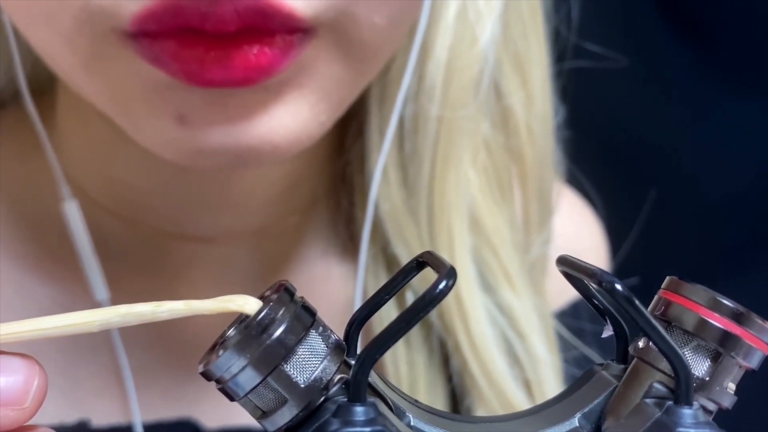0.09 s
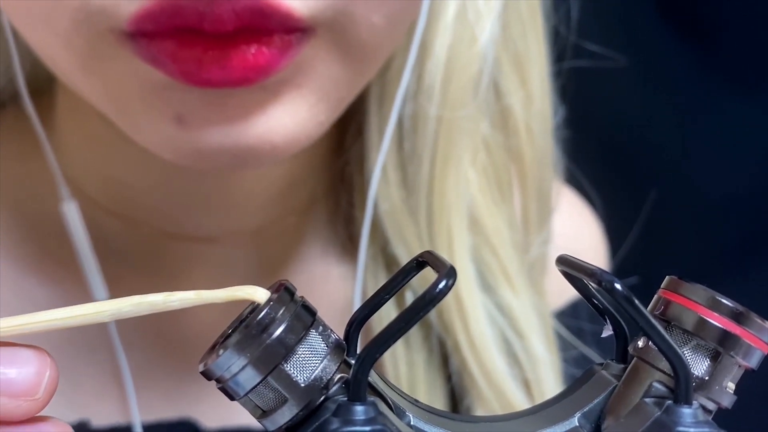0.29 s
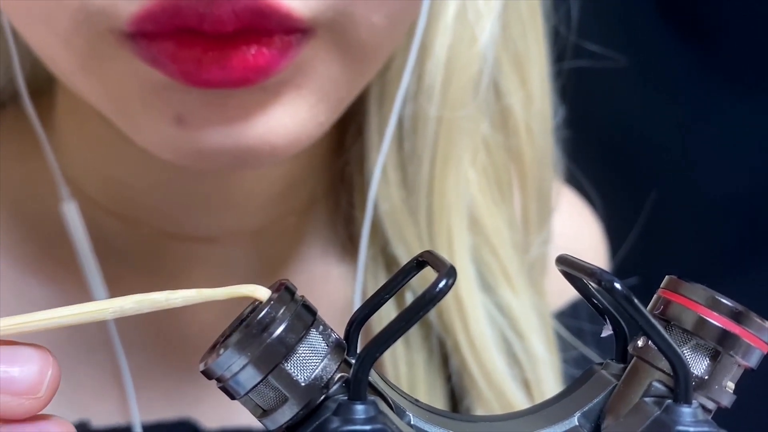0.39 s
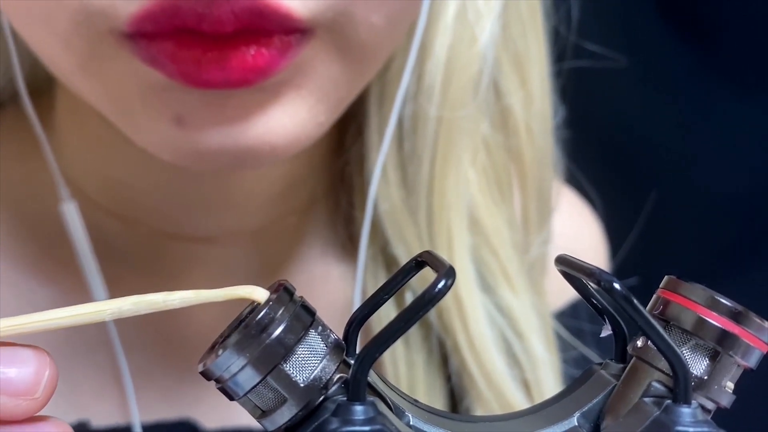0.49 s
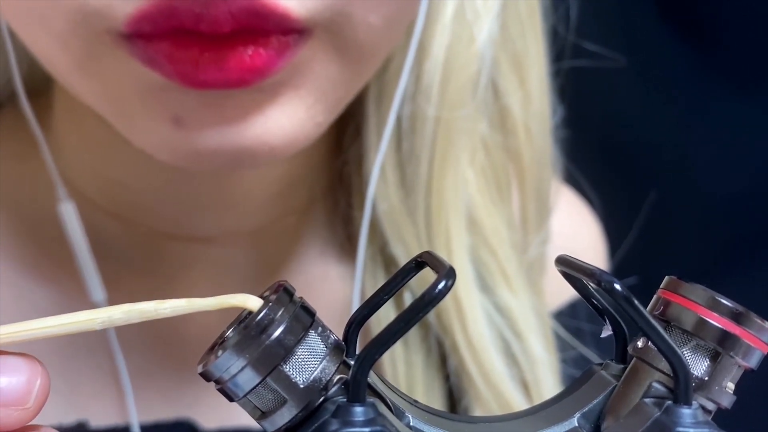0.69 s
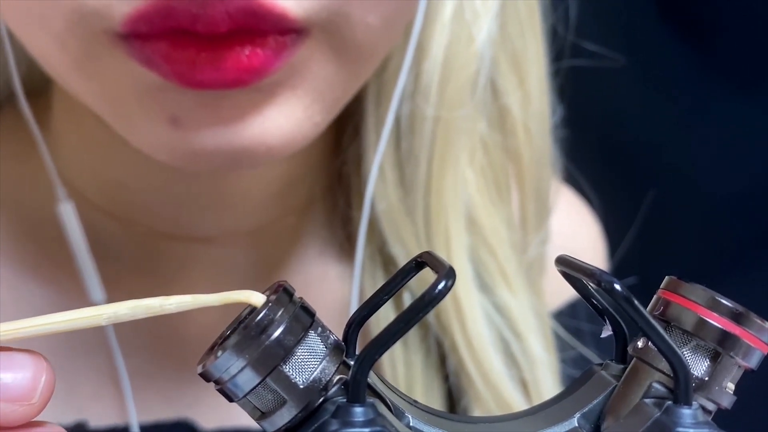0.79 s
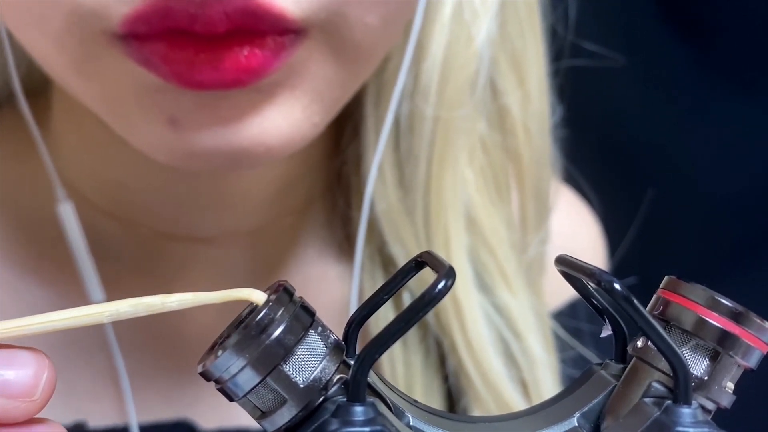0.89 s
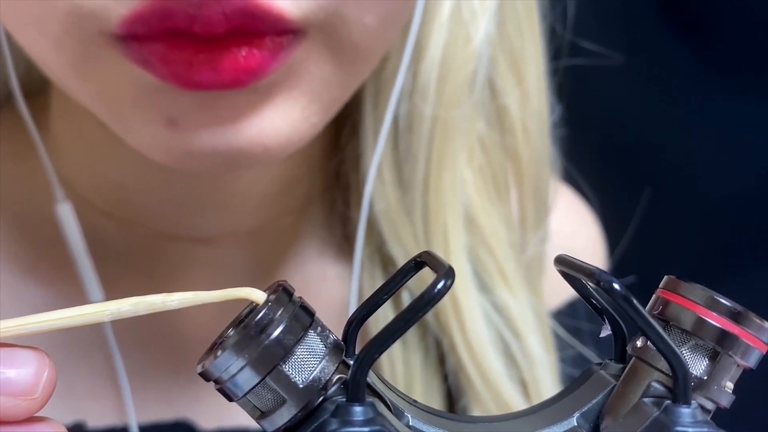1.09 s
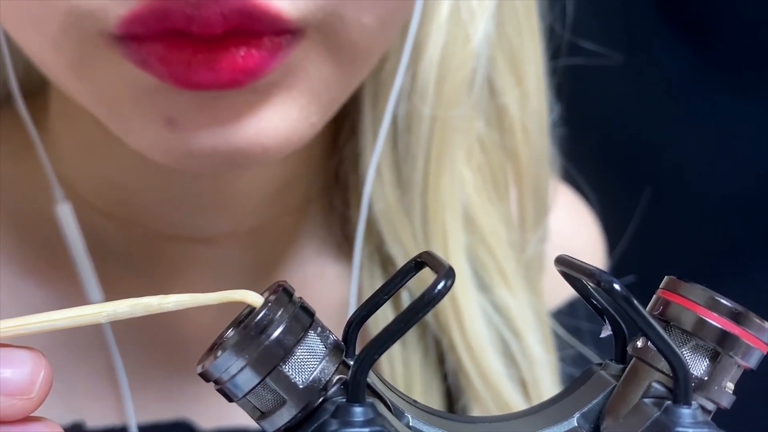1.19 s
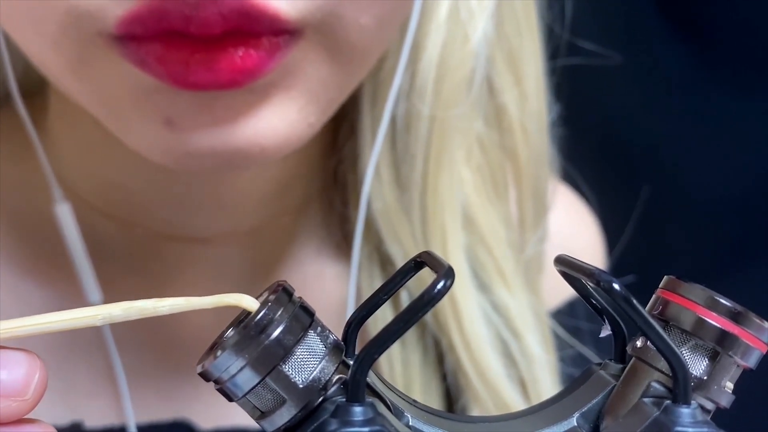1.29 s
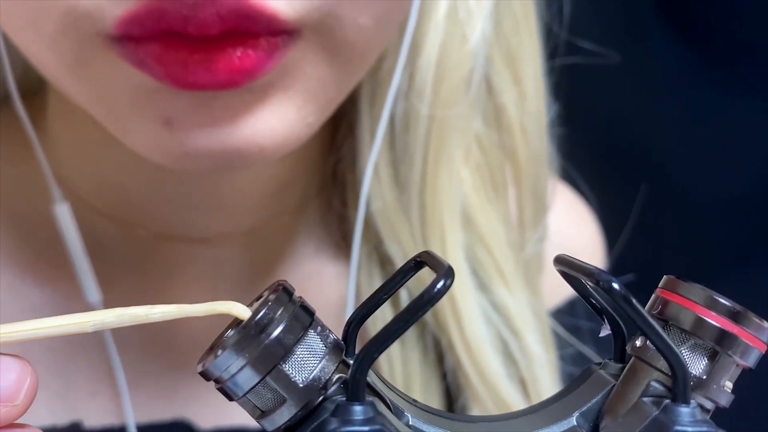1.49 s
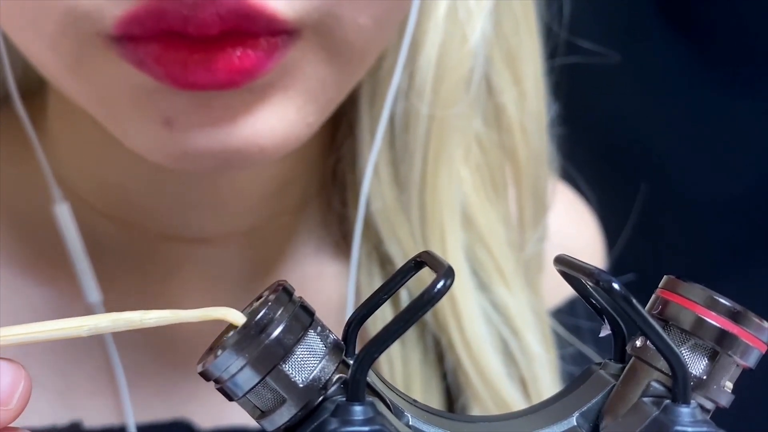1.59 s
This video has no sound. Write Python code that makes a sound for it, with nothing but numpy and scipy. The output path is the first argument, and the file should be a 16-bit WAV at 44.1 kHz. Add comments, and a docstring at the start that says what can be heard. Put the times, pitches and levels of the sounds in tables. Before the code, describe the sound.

Close scratching of a thin wooden stick on metal mesh, with sharp ticks and low handling bumps

```python
"""Pick on a microphone grille.

A wooden pick rubs, scrapes and pokes the mesh grille of the right capsule of a stereo microphone.
Contact is pulses, impulses and random slips, shaped by source spectra and resonances.
The right capsule hears it directly; the left hears mostly the ringing metal frame, plus a treble leak.
The soft mount rocks as decaying sines and slow noise, opposite in the two capsules, over faint hiss."""
import sys
import numpy as np
from scipy.fft import rfft, irfft, next_fast_len
from scipy.io import wavfile
from scipy.ndimage import map_coordinates

SR = 44100
rng = np.random.default_rng(int(sys.argv[2]) if len(sys.argv) > 2 else 0)


def output_pcm(signal):
    """Save a mono or channel-first signal as 16-bit PCM at the path in sys.argv[1].

    Samples are clipped to [-1, 1] before scaling.
    """
    pcm = np.clip(np.atleast_2d(signal).T, -1, 1) * 32767
    wavfile.write(sys.argv[1], SR, np.round(pcm).astype(np.int16))


N = 70560
T = np.arange(N) / SR  # time, s
M = next_fast_len(N + SR // 2)  # padded transform length, samples
HZ = np.fft.rfftfreq(M, 1 / SR)

REBOUND = 0.89  # swing back after a poke, as a share of the push
POKE_RING_DB = -18
# pokes, the tip slipping into the mesh: start_s (middle of the pulse), level_db, half_width_ms
POKE_EVENTS = [(.181, -39, 0.52), (0.288, -40, 0.35), (0.3227, -45.5, 0.34), (0.4262, -15.5, 0.35),
               (0.5613, -24.5, 0.54), (0.5702, -24.5, 0.24), (0.5765, -21, 0.24), (0.5784, -20.5, .7),
               (0.8061, -32, 1), (.8186, -23.5, 0.37), (0.8977, -22, 0.7), (.9010, -33, 0.45),
               (0.9054, -26, 0.4), (0.9195, -21.5, 0.43), (0.9478, -20.5, 0.33), (.9515, -23, 0.32),
               (0.955, -25.5, 1), (1.1566, -24.5, 0.51)]


def pokes():
    """Impulsive excitation: each push in and opposite swing back is a dull knock that rings the basket."""
    push = np.zeros(N)
    for start_s, level_db, half_width_ms in POKE_EVENTS:
        u = (T - start_s) * 1000 / half_width_ms
        swing = u * np.exp(1 - np.abs(u))  # peaks of -1 and +1 at u = -1 and +1
        push += amp(level_db) * swing * np.where(u > 0, REBOUND, 1)
    return filtered(push, 1 + amp(POKE_RING_DB) * ringing(BASKET_MODES))


GRAINS_PER_S, SMOOTH_SHARE = 2200, 0.83
WIRES_PER_S, WIRE_DB = 380, -9.5  # wire catches, level relative to the slips
ATTACK_S = 0.0025
# scrapes across the mesh: start_s, length_s, first_db, last_db, treble_db (relative), release_s (60 dB)
SCRAPE_EVENTS = [(.426, 0.034, -36.5, -33, -35, 0.029), (.53, 0.051, -44.5, -27.5, -30.5, 0.017),
                 (0.59, 0.012, -37, -32.5, -27, 0.058), (0.799, 0.021, -38, -32.5, -27, 0.032),
                 (0.895, .026, -27, -31, -31, 0.074), (0.946, 0.018, -29, -29, -27, 0.05)]
# spectrum of wood dragged over the grille: frequency_hz, level_db (relative)
GRILLE_SPECTRUM = [(30, -36.5), (90, 14.5), (250, 4), (500, 5.5), (700, 4.5), (900, -4.5), (1600, -14.5),
                   (2500, -15), (3300, -24.5), (6000, -31), (15000, -48)]


def scrapes():
    """Dry friction: slips and wire catches follow the contact pressure, which decays once the tip lets go."""
    body, treble = np.zeros(N), np.zeros(N)
    slips = friction(GRAINS_PER_S, SMOOTH_SHARE)
    for start_s, length_s, first_db, last_db, treble_db, release_s in SCRAPE_EVENTS:
        end_s = start_s + length_s
        level_db = np.interp(T, [start_s, end_s], [first_db, last_db])
        level_db -= 60 * np.maximum(T - end_s, 0) / release_s
        pressure = amp(level_db) * np.clip((T - start_s) / ATTACK_S, 0, 1)
        body += pressure * unit(slips + amp(WIRE_DB) * crossings(WIRES_PER_S))
        treble += amp(treble_db) * pressure * slips
    return filtered(body, basket(GRILLE_SPECTRUM)) + mesh(treble)


CLICK_T60_S, CRACK_DB = 0.0085, 2.5  # crack energy relative to the impulse
# clicks of single wires: start_s, level_db, treble_db (relative)
CLICK_EVENTS = [(.4274, -28.5, -19), (.457, -40.5, -9.5), (0.576, -34.5, -32), (.8182, -33, -11),
                (.9130, -31.5, -9), (0.9156, -22.5, -7.5), (0.9177, -24, -12), (.9642, -38, -1.5)]
# spectrum of a wire snapping free: frequency_hz, level_db (relative)
SNAP_SPECTRUM = [(100, -68.5), (400, 3), (720, -1.5), (1100, -7), (1600, -9), (2400, -6.5), (3300, -21.5),
                 (6000, -29), (15000, -33.5)]


def clicks():
    """Sudden release: a wire snapping free of the tip gives an impulse and a very short noise crack."""
    body, treble = np.zeros(N), np.zeros(N)
    for start_s, level_db, treble_db in CLICK_EVENTS:
        burst = amp(level_db) * fade(start_s, CLICK_T60_S)
        body += amp(CRACK_DB) * burst * rng.standard_normal(N)
        body[round(start_s * SR)] -= np.linalg.norm(burst)
        treble += amp(treble_db) * burst
    return filtered(body, basket(SNAP_SPECTRUM)) + mesh(treble * rng.standard_normal(N))


# light rubbing on the rim before, between and under the scrapes: time_s, level_db
RUB_LEVELS = [(0, -57), (.025, -58), (.058, -95), (.12, -95), (.145, -53), (.195, -49), (.21, -60),
              (.235, -50), (.275, -48), (.30, -66.5), (.325, -68), (.35, -80), (.52, -70), (.54, -53.5),
              (.61, -52), (.68, -77), (.71, -87), (.73, -65.5), (.795, -57.5), (.83, -53.5), (.86, -89),
              (.89, -84), (.91, -57), (.975, -53), (1.01, -70), (1.14, -66.5)]
# spectrum of wood on the rim: frequency_hz, level_db (relative)
RUB_SPECTRUM = [(40, -6), (150, 2), (300, 7.5), (550, -3.5), (700, 2), (900, -1.5), (1150, -1),
                (1500, -10.5), (2700, -8), (3300, -17), (4300, -23), (15000, -32.5)]


def rim_rubbing():
    """Light sliding friction: the pick rubs the rim under a varying pressure."""
    return rubbing(RUB_LEVELS, RUB_SPECTRUM, [])


# the long slide that ends the gesture: time_s, level_db
SLIDE_LEVELS = [(1.14, -69), (1.16, -50), (1.185, -49), (1.235, -62), (1.275, -53.5), (1.315, -58.5),
                (1.345, -54.5), (1.41, -62.5), (1.47, -60.5), (1.55, -63.5), (1.6, -50.5)]
# spectrum of the slide: frequency_hz, level_db (relative)
SLIDE_SPECTRUM = [(40, -8.5), (180, 9.5), (500, -4), (950, -3.5), (1500, -13), (2200, -7), (2900, -11.5),
                  (3800, -28), (15000, -35)]
# faint whistle of the wooden pick: frequency_hz, width_hz, level_db
SHAFT_MODES = [(5850, 440, -10), (8770, 300, -8.5)]


def long_slide():
    """Friction-driven resonance: the sliding contact also excites a faint whistle of the pick."""
    return rubbing(SLIDE_LEVELS, SLIDE_SPECTRUM, SHAFT_MODES)


RUB_GRAINS_PER_S, RUB_SMOOTH_SHARE = 900, 0.78
UNEVEN_DB, UNEVEN_PER_S = 0.6, 160  # stick and slip: depth and random knots a second
RUB_RING_DB, RUB_FRAME_DB, RUB_LEFT_DB = -5, 4.5, -21.5  # basket ring, frame to left, direct to left
SWAY_RUB_DB, SWAY_LEFT_DB = 10, -7.5  # rocking relative to the rubbing; left relative to right


def rubbing(levels, spectrum, whistle):
    """Stick-slip friction: uneven slips ring the basket and frame and rock the mount."""
    pressure = amp(np.interp(T, *np.transpose(levels), left=-np.inf, right=-np.inf))
    unevenness = amp(UNEVEN_DB * wobble(UNEVEN_PER_S))
    slips = pressure * unit(unevenness * friction(RUB_GRAINS_PER_S, RUB_SMOOTH_SHARE))
    rock = amp(SWAY_RUB_DB) * pressure * sway()
    contact = colour(spectrum) * (1 + amp(RUB_RING_DB) * ringing(BASKET_MODES))
    right = filtered(slips, contact + ringing(whistle))
    left = amp(RUB_FRAME_DB) * frame(right) - amp(RUB_LEFT_DB) * right
    return np.array([left - amp(SWAY_LEFT_DB) * rock, right + rock])


def friction(rate, smooth):
    """Granular friction: random slips of wood on wire, rate a second, plus a share of smooth noise; rms 1."""
    slips = (rng.random(N) < rate / SR) * rng.choice([-1, 1], N)
    sizes = amp(GRAIN_SPREAD_DB * np.clip(rng.standard_normal(N), -2, 2))
    return unit(unit(slips * sizes) + smooth * rng.standard_normal(N))


GRAIN_SPREAD_DB = 6.5  # standard deviation before clipping
WIRE_JITTER = 0.22  # in wire spacings


def crossings(rate):
    """Periodic excitation with jitter: the tip catches on wire after wire at an uneven pace; rms 1."""
    k = np.arange(int(rate * N / SR))
    at = ((k + WIRE_JITTER * rng.standard_normal(len(k))) * SR / rate).astype(int)
    train = np.bincount(np.clip(at, 0, N - 1), minlength=N)
    return unit(train - train.mean())


# resonances of the grille basket: frequency_hz, width_hz, level_db
BASKET_MODES = [(699, 51, -1.9), (1121, 55, 1.1), (2090, 85, 1), (2500, 276, -2)]


def basket(spectrum):
    """Source and resonator: a contact spectrum is multiplied by the modes of the grille basket."""
    return colour(spectrum) * (1 + ringing(BASKET_MODES)) / np.sqrt(2)


# treble spectrum of the mesh: frequency_hz, level_db (relative)
MESH_SPECTRUM = [(500, 6.5), (3000, 0.5), (5400, 0.5), (6800, -7.5), (8800, 1), (11500, 0), (12500, -3),
                 (14800, -12), (15800, -19)]
# resonances of the fine wires: frequency_hz, width_hz, level_db
WIRE_MODES = [(5620, 53, 6), (9700, 75, -26), (10700, 120, 5)]


def mesh(x):
    """Modal resonance: narrow modes of the fine wires colour the bright part of the contact."""
    return filtered(x, colour(MESH_SPECTRUM) * (1 + ringing(WIRE_MODES)))


WAVER_PER_S = 30  # random knots a second
# resonances of the metal frame: frequency_hz, width_hz, level_db, waver_radians
FRAME_MODES = [(707, 20, -18, 0.95), (862, 63, 2.5, 1), (1838, 64, -3, 1), (2113, 215, -2, 0.26),
               (2545, 630, -12, 0.29)]


def frame(x):
    """Structure-borne transmission: frame modes carry x to the left, their phases wavering as the tip moves."""
    out = np.zeros(N)
    for k, (hz, width_hz, level_db, waver) in enumerate(FRAME_MODES):
        mode = ringing([(hz, width_hz, level_db)])
        ring, quarter_turned = filtered(x, mode * np.array([[1], [1j]]))
        turn = waver * wobble(WAVER_PER_S)
        out += (-1) ** k * (ring * np.cos(turn) + quarter_turned * np.sin(turn))  # alternate signs
    return out


def air_leak(x, level_db=-11.5, corner_hz=3900):
    """Airborne transmission: a first-order high-pass lets mainly the treble cross to the left capsule."""
    return filtered(x, amp(level_db) * 1j * HZ / (HZ + corner_hz))


JOLT_T60_S = 0.11
# the mount springs back as the tip lets go: start_s, level_db (right), pitch_hz, left_db (relative)
JOLT_EVENTS = [(0.136, -28.5, 57, -4), (.193, -21, 57.4, -4.5), (.222, -26, 77, -4.5), (0.272, -23, 72, -7),
               (0.424, -37, 108, 1), (0.446, -24, 48.5, -7.5), (0.572, -28, 59, -31),
               (0.818, -25, 69.7, -11.5), (0.9136, -18, 75, -15.5), (0.9437, -23.5, 77.5, -12),
               (0.96, -18.5, 60, -12), (1.167, -24.5, 73.5, -4.5), (1.58, -36, 79.4, -15)]


def jolts():
    """Damped oscillation: low decaying sines of the mount, opposite in the two capsules."""
    out = np.zeros((2, N))
    for start_s, level_db, pitch_hz, left_db in JOLT_EVENTS:
        swing = amp(level_db) * fade(start_s, JOLT_T60_S) * np.sin(2 * np.pi * pitch_hz * (T - start_s))
        out += np.outer([amp(left_db), -1], swing)
    return out


# rocking of the mount: frequency_hz, level_db (relative)
SWAY_SPECTRUM = [(20, -38.5), (45, -9), (78, -5.5), (100, -0.5), (140, -11), (250, -17.5), (600, -54)]


def sway():
    """Random vibration: low-frequency noise for the slow rocking of the mount, rms 1."""
    return unit(filtered(rng.standard_normal(N), colour(SWAY_SPECTRUM)))


HISS_DB = -56.5
# background hiss: frequency_hz, level_db (relative)
HISS_SPECTRUM = [(25, 36.5), (60, 37), (150, 22.5), (400, 14.5), (900, 9), (1800, 6.5), (3500, 0.5),
                 (15000, -2)]


def hiss():
    """Stationary noise: faint coloured noise, independent in the two capsules."""
    return amp(HISS_DB) * filtered(rng.standard_normal((2, N)), colour(HISS_SPECTRUM))


def amp(db):
    """Logarithmic level: decibels to gain."""
    return 10 ** (np.asarray(db) / 20)


def unit(x):
    """Normalization: scale to rms 1."""
    return x / np.sqrt(np.mean(x ** 2) + 1e-20)


def filtered(x, response):
    """Linear filtering: x is multiplied by a frequency response in the spectrum."""
    return irfft(rfft(x, M) * response, M)[..., :N]


def colour(points):
    """Minimum phase: a causal response of unit power through (frequency_hz, level_db) points."""
    hz, db = np.transpose(points)
    gain = unit(amp(np.interp(np.log(HZ + 1), np.log(hz), db)))
    cepstrum = irfft(np.log(gain), M)
    cepstrum[1:M // 2] *= 2  # fold onto positive time
    cepstrum[M // 2 + 1:] = 0
    return np.exp(rfft(cepstrum))


def ringing(modes):
    """Modal superposition: the summed response of damped resonances."""
    return sum(amp(db) * 1j * HZ * width / (hz * hz - HZ ** 2 + 1j * HZ * width)
               for hz, width, db in modes)


def fade(start, t60):
    """Exponential decay: silence, then a fall of 60 dB in t60 seconds from start."""
    return (T >= start) * amp(-60 * np.maximum(T - start, 0) / t60)


def wobble(rate):
    """Random modulation: a smooth curve through rate random knots a second."""
    return map_coordinates(rng.standard_normal(SR // 20), [T * rate], mode="mirror")


def scene():
    """Superposition: contact on the right, frame and leak on the left, rubbing, mount and hiss in both."""
    right = pokes() + scrapes() + clicks()
    left = frame(right) + air_leak(right)
    return np.array([left, right]) + rim_rubbing() + long_slide() + jolts() + hiss()


def record(dry, top_hz=15800):
    """Band limiting: nothing passes at or above top_hz."""
    return filtered(dry, HZ < top_hz)


dry = scene()
out = record(dry)
output_pcm(out)
```